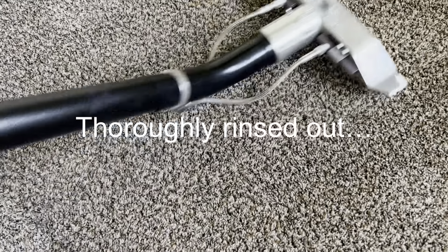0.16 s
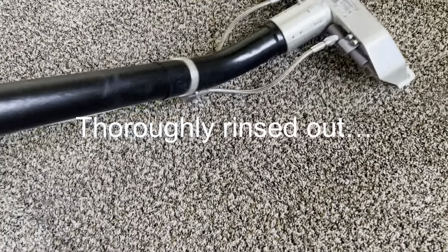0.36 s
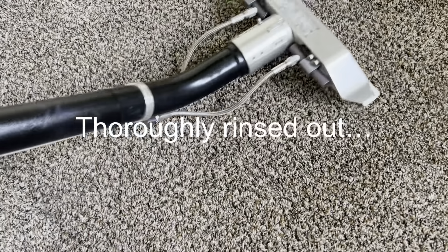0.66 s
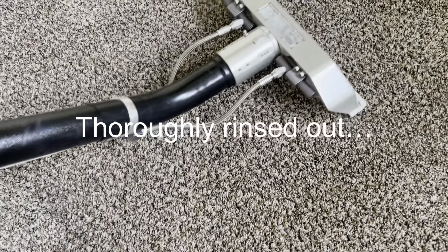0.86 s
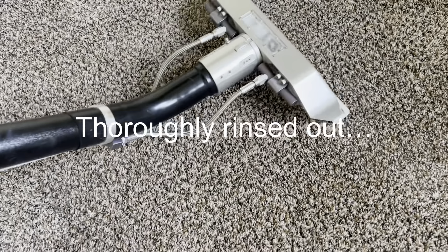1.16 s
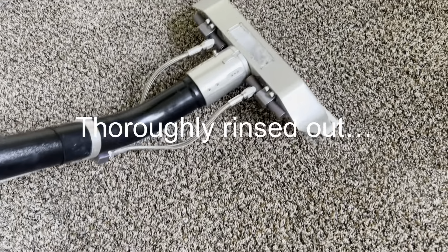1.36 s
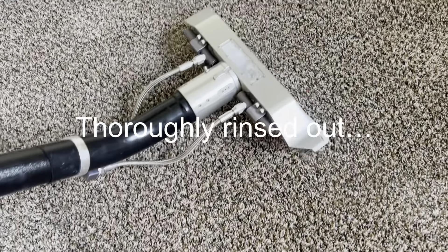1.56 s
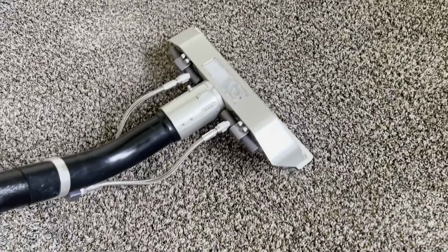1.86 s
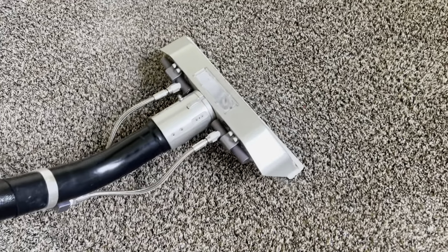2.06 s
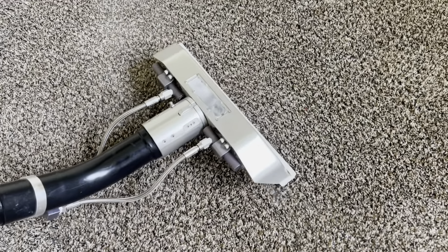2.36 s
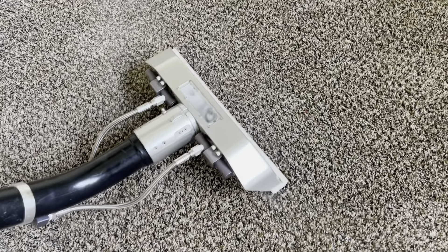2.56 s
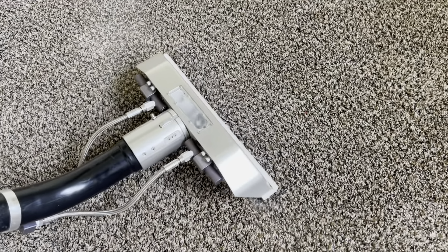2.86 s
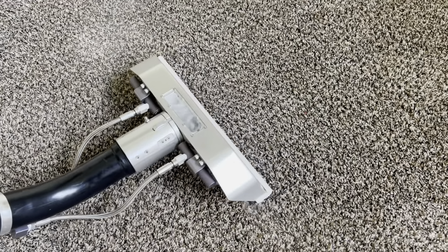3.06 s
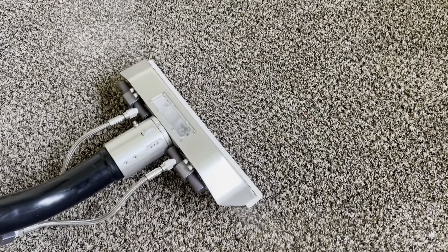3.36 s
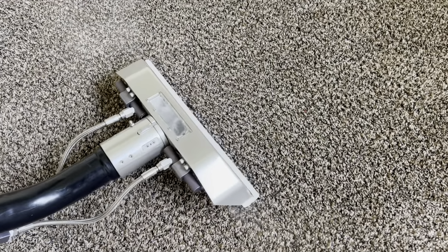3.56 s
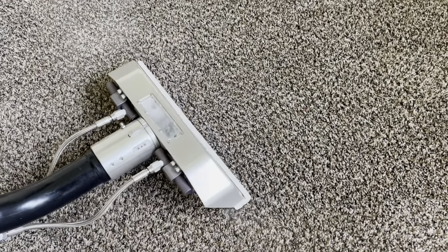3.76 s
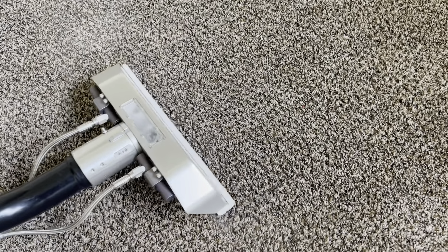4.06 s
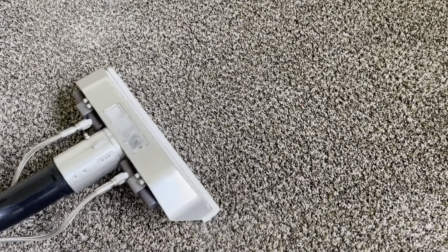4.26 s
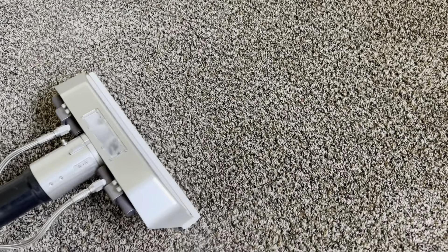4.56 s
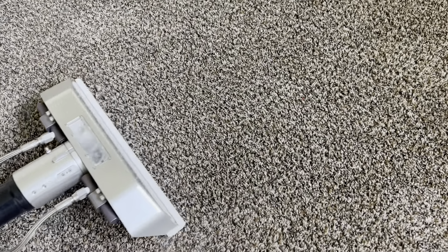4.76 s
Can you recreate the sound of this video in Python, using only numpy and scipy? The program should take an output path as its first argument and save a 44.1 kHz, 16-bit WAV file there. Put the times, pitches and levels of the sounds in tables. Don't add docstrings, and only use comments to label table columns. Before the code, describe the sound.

Continuous airy suction roar with bright spray hiss, a faint early whistle and low motor hum, with a few soft hose bumps.

```python
import sys
import numpy as np
from scipy import signal
from scipy.fft import rfft, irfft, next_fast_len
from scipy.io import wavfile
from scipy.ndimage import uniform_filter1d, map_coordinates

SR = 44100
rng = np.random.default_rng(int(sys.argv[2]) if len(sys.argv) > 2 else 0)


def digitize_waveform(pressure):
    field = np.atleast_2d(pressure).T
    bounded = np.clip(field, -1, 1)
    quanta = np.round(bounded * 32767).astype(np.int16)
    wavfile.write(sys.argv[1], SR, quanta)


def natural_amplitude(level_db):
    exponent = np.asarray(level_db, float) / 20
    return 10 ** exponent


N = 216485
TIME = np.arange(N) / SR
SIZE = next_fast_len(N)
HZ = np.fft.rfftfreq(SIZE, 1 / SR)


def curves(table):
    s, *columns = np.transpose(table)
    return [np.interp(TIME, s, c) for c in columns]


def over_hz(table):
    hz, *columns = np.transpose(table)
    return [np.interp(np.log(HZ + 1), np.log(hz), c) for c in columns]


def unit(x):
    return x / np.sqrt(np.mean(x ** 2))


def smooth_noise(shape, size):
    return uniform_filter1d(rng.standard_normal(shape), size=size, axis=-1)


def colour(table):
    return natural_amplitude(over_hz(table)[0])


def air(response):
    white = rng.standard_normal((3, SIZE))
    return unit(irfft(rfft(white) * response, SIZE)[:, :N])


def turbulence(patchy_db, quick_db, width_hz):
    shape = (257, N // 128 + 3)
    bins = max(int(width_hz / 86), 1)
    slow = uniform_filter1d(smooth_noise(shape, 60), bins, axis=0)
    quick = uniform_filter1d(smooth_noise(shape, 6), 4 * bins, axis=0)
    return natural_amplitude(patchy_db * unit(slow) + quick_db * unit(quick))


def flutter(x, gain):
    z = signal.stft(x, nperseg=512, noverlap=384)[2]
    z = z * gain[:, :z.shape[-1]]
    return signal.istft(z, nperseg=512, noverlap=384)[1][..., :N]


# pitch in Hz, left minus right in dB, share of direct sound 0-1,
# extra lead of the right port in rad.
PORTS = [(100, -.1, 0.94, 0.25), (300, -0.5, 0.9, 0.31), (600, -0.1, 0.77, -0.4), (1250, -2.5, 0.59, 0.57),
         (1630, -3.5, 0.71, 0.95), (2410, -6, 0.93, 0.048), (3600, -1, 0.4, -1.12), (4160, 0, 0.52, -2),
         (4740, 10.5, 0, 0.26), (7450, 2, 0.39, -0.38), (9100, 1, 1, -0.16), (11200, -1.5, 1, 0.31),
         (13500, 2.5, 0.8, -0.14), (16000, -4, 0.9, 0.078)]


def ports(x, lag):
    side_db, direct, lead = over_hz(PORTS)
    direct = np.clip(direct, 0, 1)
    if np.ndim(lag):
        late = rfft(map_coordinates(x[0], [np.arange(N) - lag], order=5, mode="nearest"), SIZE)
    else:
        late = rfft(x[0], SIZE) * np.exp(-2j * np.pi * HZ * lag / SR)
    near, room = np.sqrt(direct), np.sqrt(1 - direct)
    left = near * late * np.exp(-1j * lead) + room * rfft(x[1], SIZE)
    right = near * rfft(x[0], SIZE) + room * rfft(x[2], SIZE)
    both = np.array([left * natural_amplitude(side_db / 2), right * natural_amplitude(-side_db / 2)])
    return irfft(both, SIZE)[:, :N]


# time in seconds, travel 0-1, suction in dB.
WAND = [(0, 0, -0.5), (.3, 0, -1), (1.0, 0.05, 0), (1.75, 0.27, 0), (2.2, 0.3, -0.1), (2.4, 0.42, 1),
        (3.05, 0.46, 0.5), (3.33, .55, -1), (3.5, 0.52, .5), (3.81, 0.69, 0.5), (3.94, 0.75, -1.5),
        (4.06, .73, 1), (4.5, 0.83, -.5), (4.91, 0.95, 0)]


def along_stroke(layers):
    x, suction_db = curves(WAND)
    start, middle, end = (1 - x) * (1 - 2 * x), 4 * x * (1 - x), x * (2 * x - 1)
    return natural_amplitude(np.array(layers) @ np.array([start, middle, end, suction_db]))


def resonance(hz, width_hz):
    return 1 / (1 + (2 * (HZ - hz) / width_hz) ** 2)


# pitch in Hz, level in dB.
TUBE = [(300, -15), (450, -8), (600, 2), (900, -0.5), (1300, 0.5), (1550, -4.5), (1900, -5.5),
        (2600, -28.5)]
CAVITY = [(1100, -42), (1600, -5.5), (2000, -4), (2450, 0), (2700, -4), (3100, -7.5), (4500, -12.5),
          (6000, -38)]
LIP = [(2200, -17.5), (2700, 0.5), (3000, 0.5), (3500, -4.5), (4300, -6), (5500, -22)]
# level in dB at the start, middle and end of the stroke, dB per dB of suction.
SLOT_LAYERS = [
    (-29.5, -29, -27, 1),
    (-31.5, -28.5, -26.5, 1.66),
    (-33.5, -34, -40, .5),
]
# pitch in Hz, width in Hz, level in dB.
TUBE_MODES = [(362, 15, -43.5), (466, 24, -55.5), (573.5, 4.7, -44.5), (627, 27, -62), (700, 7.2, -48),
              (798.7, 44, -38), (918, 29, -43), (1265, 50, -45.5), (1590, 4.9, -45)]
# left minus right in dB at the start, middle and end of the stroke,
# dB per dB of suction.
SLOT_PAN = [(-0.22, .1, 1.9, .01)]


def slot():
    levels = along_stroke(SLOT_LAYERS)
    torn = sum(level * air(colour(c)) for level, c in zip(levels, (TUBE, CAVITY, LIP)))
    modes = sum(natural_amplitude(db) * np.sqrt(20 / width) * resonance(hz, width) for hz, width, db in TUBE_MODES)
    ring = natural_amplitude(-35.5) * air(modes)
    roar = flutter(torn + ring, turbulence(patchy_db=1.3, quick_db=0.74, width_hz=250))
    lag_start, lag_end = 0.88, -7
    travel = curves(WAND)[0]
    heard = ports(roar + whistle(), lag_start + (lag_end - lag_start) * travel)
    pan = np.sqrt(along_stroke(SLOT_PAN)[0])
    return heard * np.array([pan, 1 / pan])


# time in seconds, pitch in Hz, level in dB.
WHISTLE = [(0, 847, -32), (.3, 847, -30.5), (.42, 851, -38.5), (.9, 860, -36.5), (1.1, 844, -36.5),
           (1.45, 843, -41), (1.9, 864, -36), (2.1, 854, -44), (3.0, 854, -44), (3.3, 850, -52)]
# multiple of the pitch, level in dB.
WHISTLE_ORDERS = [
    (1, 0),
    (2, -6.5),
    (3, -20),
]


def whistle():
    hz, level_db = curves(WHISTLE)
    waver_hz, waver_db = 6, 3
    waver = unit(uniform_filter1d(smooth_noise((2, N), 1600), size=1600))
    turn = 2 * np.pi * np.cumsum(hz + waver_hz * waver[0]) / SR
    shift = np.array([[.05], [1.6], [-1.4]])
    tone = sum(natural_amplitude(db) * np.sin(k * turn + shift) for k, db in WHISTLE_ORDERS)
    return tone * natural_amplitude(level_db + 2.5 + waver_db * waver[1])


# pitch in Hz, level in dB.
HISS = [(3000, -30), (4200, -3), (5200, 0), (5450, -4), (5650, 1), (7000, 0), (8800, 0), (9900, -2.5),
        (10500, -4), (11500, -30)]
SIZZLE = [(9700, -30), (10400, -8), (11100, 0), (12000, -.5), (14000, -2.5), (15500, -2.5), (17000, -4)]
# level in dB at the start, middle and end of the stroke, dB per dB of suction.
JET_LAYERS = [
    (-33.5, -33, -32.5, 0.27),
    (-29.5, -29, -32.5, 0.54),
]


def jets():
    levels = along_stroke(JET_LAYERS)
    spray = sum(level * air(colour(c)) for level, c in zip(levels, (HISS, SIZZLE)))
    spray = flutter(spray, turbulence(patchy_db=1.04, quick_db=0.38, width_hz=1900))
    lag = 6.44 + 0.18 * curves(WAND)[0]
    return ports(spray, lag)


# pitch in Hz, level in dB.
HOSE_BANDS = [
    [(15, -34), (30, -27), (45, -11), (58, 11), (75, -3), (100, -38)],
    [(50, -35), (80, -3), (110, 1.5), (135, -5.5), (165, -8), (220, -29.5)],
    [(120, -32), (165, 1.5), (200, -0.5), (250, 3), (290, -4.5), (380, -50)],
    [(230, -23), (300, 3.5), (370, 5), (385, -3.5), (420, 6), (480, 3.5), (600, -7), (900, -31)],
]
HOSE_DB = [-58.5, -46.5, -43, -37.5]
HOSE_CENTRES_HZ = [55, 110, 220, 400]
# time in seconds, swell in dB, length in seconds, pitch in Hz.
BUMPS = [
    (.13, 17, .15, 60),
    (.45, 6, .2, 50),
    (.14, 5, .1, 300),
    (.56, 6, .05, 230),
    (3.79, 5, .05, 330),
    (4.78, 9, .06, 210),
    (4.75, 3, .2, 50),
]


def bump_swell(hz):
    total = 0
    for s, db, length, bump_hz in BUMPS:
        octaves = np.log2(hz / bump_hz)
        total = total + db * np.exp(-((TIME - s) / length) ** 2 - (octaves / 0.9) ** 2)
    return total


def hose():
    bands = zip(HOSE_DB, HOSE_CENTRES_HZ, HOSE_BANDS)
    rumble = sum(natural_amplitude(db + bump_swell(hz)) * air(colour(band)) for db, hz, band in bands)
    return ports(flutter(rumble, turbulence(patchy_db=0.7, quick_db=-0.5, width_hz=200)), .1)


# time in seconds, lobe tone in dB.
BLOWER = [
    (0, -24.5),
    (2.0, -25.5),
    (3.75, -26),
    (4.08, -29.5),
    (4.91, -28.5),
]
# pitch in Hz, level in dB.
BLOWER_WEAK = [(50, -82), (100, -51.5), (225, -55.5)]


def blower():
    lobe_hz = 149.9
    tone_db = curves(BLOWER)[0]
    half_db = tone_db[0] - 12.5 + 0.52 * (tone_db - tone_db[0])
    tone, half = np.sqrt(2) * natural_amplitude(tone_db), np.sqrt(2) * natural_amplitude(half_db)
    turn = 2 * np.pi * lobe_hz * TIME
    *starts, half_start = 2 * np.pi * rng.random(len(BLOWER_WEAK) + 1)
    half_turn = turn / 2 + half_start
    weak = sum(natural_amplitude(db) * np.sin(turn * hz / lobe_hz + p) for (hz, db), p in zip(BLOWER_WEAK, starts))
    left = tone * np.sin(turn) + half * np.sin(half_turn)
    right = tone * natural_amplitude(0.53) * np.sin(turn + 0.091) + half * natural_amplitude(0.4) * np.sin(half_turn + .06)
    return np.array([left, right]) + np.sqrt(2) * weak


def scene():
    return slot() + jets() + hose() + blower()


def band_limit(x):
    return signal.sosfilt(signal.butter(12, 15740, fs=SR, output="sos"), x)


def record(dry):
    low_cut = signal.butter(3, 45, "high", fs=SR, output="sos")
    mix = signal.sosfilt(low_cut, dry)
    return band_limit(mix)


dry = scene()
out = record(dry)
digitize_waveform(out)
```